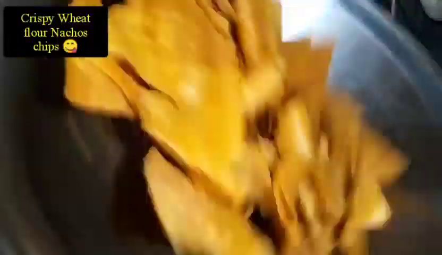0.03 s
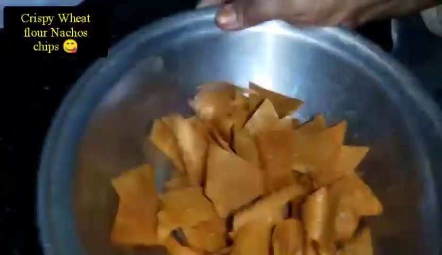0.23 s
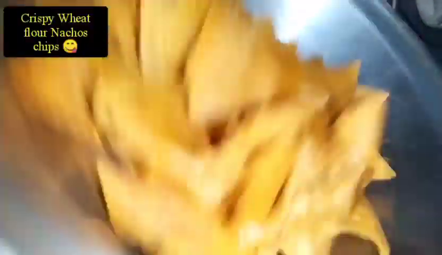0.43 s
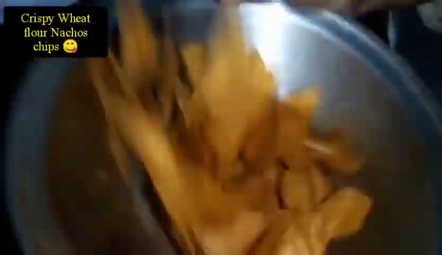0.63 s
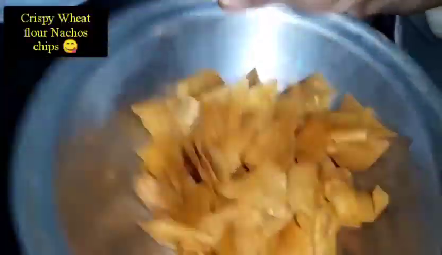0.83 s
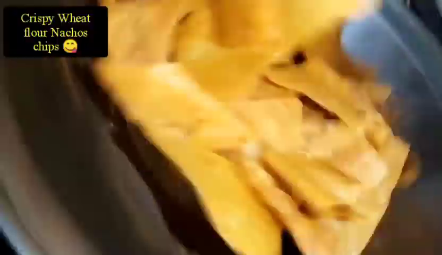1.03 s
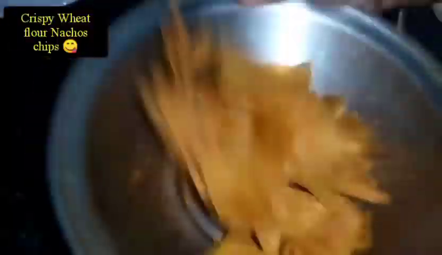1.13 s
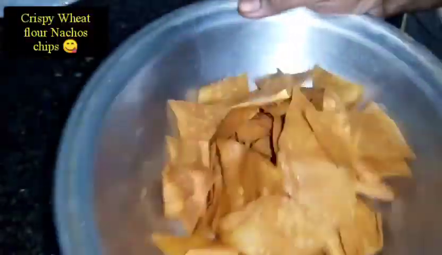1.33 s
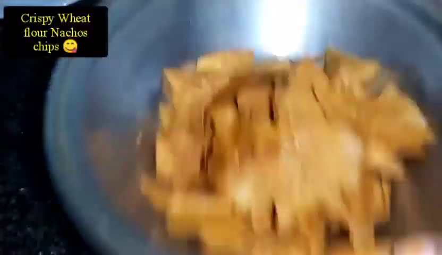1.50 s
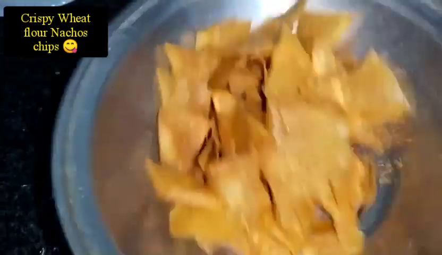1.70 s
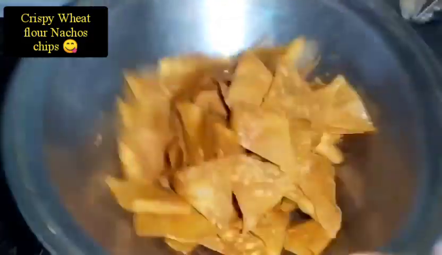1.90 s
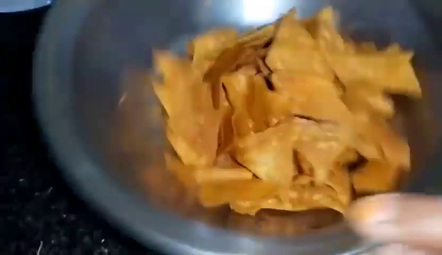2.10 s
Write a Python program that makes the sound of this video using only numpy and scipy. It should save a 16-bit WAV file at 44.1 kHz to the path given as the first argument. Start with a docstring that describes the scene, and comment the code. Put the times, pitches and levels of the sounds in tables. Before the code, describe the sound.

Crisp chips clatter in a steel bowl, tossed three times and landing at about 0.2, 0.7 and 1.2 seconds. Each landing is a shower of dry clicks with a brief metallic ring and a faint low thump, with near silence between. From about 1.5 seconds to just past 2, gentler shaking gives a softer rattle over a faint rumble. The sound is close, with a short kitchen echo.

```python
"""Crisp fried chips are tossed three times in a steel bowl, then shaken gently, in a small kitchen.
Each landing is a shower of brief impacts, heard as dry clicks; chips that strike the wall excite the
bowl's normal modes. Low thumps lie under the three landings and a soft rumble under the shaking.
Hard walls add a short echo, and the room hums. An expander ducks the quiet moment while the chips
are in the air, and a limiter rounds off the peaks."""
import sys
import numpy as np
from scipy import signal
from scipy.fft import rfft, irfft, next_fast_len
from scipy.io import wavfile
from scipy.ndimage import uniform_filter1d

SR = 44100
rng = np.random.default_rng(int(sys.argv[2]) if len(sys.argv) > 2 else 0)


def unload_audio(sound):
    """Save the sound as a 16-bit wav file, at the path given as the first command line argument."""
    columns = np.transpose(np.atleast_2d(sound))
    # keep every value between -1 and 1, then stretch to whole-number steps
    steps = np.round(np.clip(columns, -1, 1) * 32767)
    wavfile.write(sys.argv[1], SR, steps.astype(np.int16))


N = 94815

# How hard the chips rattle: three tosses, then shaking. Each row: time in seconds, level in dB.
RATTLE_ENVELOPE = [(0, -43), (.056, -52), (.072, -58.5), (.11, -61.5), (.14, -58), (.171, -60),
                   (.174, -39.5), (.188, -24), (.212, -22), (.228, -15), (.275, -18), (.296, -26),
                   (.315, -22.5), (.335, -25), (.354, -24), (.364, -28), (.4, -28), (.456, -48), (.55, -54),
                   (.562, -76), (.674, -76), (.682, -29.5), (.7, -28), (.712, -20.5), (.726, -22),
                   (.744, -14), (.784, -13), (.796, -19), (.812, -15), (.85, -19), (.866, -28), (.895, -25),
                   (.946, -39), (.956, -33), (.976, -38), (1.025, -37), (1.082, -45), (1.11, -57),
                   (1.154, -63), (1.17, -42), (1.196, -44), (1.218, -18), (1.24, -13), (1.28, -13),
                   (1.303, -19), (1.335, -15), (1.366, -22), (1.43, -29), (1.45, -26), (1.49, -31),
                   (1.525, -40), (1.548, -37), (1.575, -29), (1.598, -26), (1.648, -27), (1.664, -36),
                   (1.7, -28), (1.75, -26), (1.774, -21.5), (1.834, -32.5), (1.892, -22), (1.958, -29),
                   (2.006, -33), (2.034, -27), (2.06, -33), (2.15, -32.5)]
# Single chips that snap against the pile. Each row: start in seconds, level in dB.
CHIP_SNAPS = [(.156, -44.5), (.182, -28), (0.1852, -14), (.3115, -18), (0.346, -18), (.3775, -21),
              (.5505, -47), (.657, -42), (0.6864, -25), (.7135, -17), (.7445, -9), (.7595, -13.5),
              (.7725, -14), (.8285, -16.5), (.9517, -21), (0.9886, -30), (1.0226, -26), (1.0335, -33),
              (1.0575, -27.5), (1.0779, -30), (1.156, -44), (1.167, -39), (1.2, -25.5), (1.2106, -21),
              (1.2151, -15.5), (1.241, -10), (1.274, -7.5), (1.3145, -6), (1.4476, -25), (1.6836, -23.5),
              (1.7635, -24), (1.799, -23), (2.0298, -26)]
# Spectrum of a chip's click. Each row: frequency in Hz, level in dB.
CHIP_SPECTRUM = [(30, -49), (100, -24.5), (250, -17.5), (400, -19.5), (750, -10.5), (1300, -7), (2000, -3),
                 (3100, 3), (4300, -1.5), (5200, -2.5), (6600, -5), (8200, -13.5), (10000, -19.5),
                 (13000, -22.5), (15500, -33.5)]
# Normal modes of the bowl. Each row: frequency in Hz, level in dB, T60 in seconds before added damping.
BOWL_MODES = [(486, -12.5, 0.2), (1251, -12.5, 0.25), (1435.4, -5.5, 0.14), (2020, -6, 0.16),
              (2061, -7.5, 0.15), (2116, -1, 0.15), (2843, -3, 0.16), (2930, -9, 0.12), (3077, -6, 0.043),
              (3184, -7, 0.059), (3755, -5.5, 0.14), (3880, -8.5, 0.13), (4890, -1, 0.077), (5075, -2, .06),
              (5942, -7, 0.11), (6370, -11, 0.086), (7275, -15.5, 0.07)]
# Hard blows on the wall. Each row: start in seconds, level in dB, frequency in Hz that the spot favours.
WALL_BLOWS = [(.1361, -42, 3050), (.1855, -18, 5000), (0.1997, -3.5, 2850), (.2055, -10.5, 1450),
              (.207, -17, 480), (.219, -9.5, 5000), (.233, -8, 5150), (.2445, -6, 1890), (.261, -8, 2100),
              (.2705, 0.5, 2820), (0.344, -17.5, 6100), (.679, -25, 2850), (.707, -13.5, 2100),
              (.733, -10.5, 2130), (.777, -8, 4850), (.802, -10, 4960), (.8095, -5, 5280),
              (.836, -9.5, 6970), (1.156, -39.5, 6100), (1.167, -29.5, 6800), (1.2134, -6, 2960),
              (1.228, -12.5, 2090), (1.247, -6, 2150), (1.259, -8, 1440), (1.275, -10.5, 3780),
              (1.331, -9, 2850), (1.57, -23, 2160)]
# The part of the rattle that strikes bare steel. Each row: time in seconds, level in dB over the rattle.
STEEL_SHARE = [(0, -1.5), (.18, 1), (.22, 3), (.27, 0), (.33, -5.5), (.5, -0.5), (.7, 1.5), (.77, -4.5),
               (.81, -13.5), (.86, -9.5), (.92, -5.5), (1.05, -14), (1.17, -11), (1.22, -1.5), (1.27, -2),
               (1.42, -4.5), (1.58, -3), (1.65, -7), (1.77, -4.5), (1.86, -3.5), (2.15, -3)]
# Dull knock of the wall's many well-damped modes. Each row: frequency in Hz, level in dB.
KNOCK_SPECTRUM = [(40, -29.5), (150, -13), (350, -11), (520, -3.5), (800, 0.5), (1500, -2), (3000, -3),
                  (6000, -17.5), (12000, -43.5)]
# Three low thumps, then a soft rumble. Each row: centre in seconds, level in dB, half width in seconds.
LOW_SWELLS = [(.25, -47, 0.026), (.82, -57, .04), (1.27, -60, 0.021), (1.85, -55, 0.4)]
# Spectrum of the thumps and rumble. Each row: frequency in Hz, level in dB.
RUMBLE_SPECTRUM = [(20, -18.5), (45, -14.5), (80, 1.5), (130, -0.5), (220, -9), (500, -23), (2000, -76)]
# Spectrum of the room's hum. Each row: frequency in Hz, level in dB.
HUM_SPECTRUM = [(25, -42.5), (45, -21), (80, -4), (130, -6.5), (300, -2.5), (600, -11), (2000, -16.5),
                (8000, -36), (15000, -53)]
# Reverberation of the kitchen. Each row: frequency in Hz, T60 in seconds.
KITCHEN_DECAY = [(200, 0.31), (2000, 0.28), (6000, 0.18), (14000, 0.21)]


def chip_clatter(rattle_db, offset_db=-1):
    """Impacts of chip on chip superpose into a clatter, with a few snaps standing out."""
    clatter = amp(rattle_db + offset_db) * contact_shower(rattle_db, per_s=3600)
    for (start, db), click in zip(CHIP_SNAPS, chip_clicks(len(CHIP_SNAPS))):
        add(clatter, start, amp(db) * click)
    return coloured(clatter, CHIP_SPECTRUM)


def chip_clicks(count, crack_t60_s=0.0096, clink_t60_s=.016, clink_range_hz=(999, 7572)):
    """Each impact is a damped transient: a brittle crack and a clink at the chip's own pitch."""
    t = np.arange(512) / SR
    life_scatter = np.exp(0.44 * rng.standard_normal((count, 1)))
    crack = rng.standard_normal((count, len(t))) * decay(t, life_scatter * crack_t60_s)
    clink_hz = rng.uniform(*clink_range_hz, (count, 1))
    clink = np.sin(2 * np.pi * clink_hz * t) * decay(t, clink_t60_s)
    return crack + 0.48 * clink


def contact_shower(rattle_db, per_s, crowding=.25, spread_db=4.5, window=1300):
    """Contacts form a Poisson process, held at even power and denser as the rattle grows."""
    rate = per_s * amp(crowding * (rattle_db + 20))  # equals per_s at -20 dB
    onsets = np.flatnonzero(rng.random(N) < rate / SR)
    strengths = amp(spread_db * rng.standard_normal(N))
    clicks = chip_clicks(len(onsets)) * strengths[onsets, None]
    positions = onsets[:, None] + np.arange(clicks.shape[1])
    shower = np.bincount(positions.ravel(), clicks.ravel(), N)[:N]
    power = uniform_filter1d(uniform_filter1d(shower ** 2, window), window)
    return shower / np.sqrt(np.abs(power) + 1e-6)


def wall_blows(spot_octaves=0.11, click_db=-16.5):
    """Modal excitation: a hard blow clicks, and the spot struck sets how strongly each mode rings."""
    ringing, clicking = np.zeros(N), np.zeros(N)
    mode_hz, mode_db, _ = np.transpose(BOWL_MODES)
    for (start, db, spot_hz), click in zip(WALL_BLOWS, chip_clicks(len(WALL_BLOWS))):
        weights = 1 / (1 + (np.log2(mode_hz / spot_hz) / spot_octaves) ** 2)
        weights /= np.linalg.norm(weights * amp(mode_db))
        weights *= rng.choice([-1, 1], len(mode_hz))
        add(ringing, start, amp(db) * weights @ bowl_partials(t60_scale=0.87, detune=0.0023))
        add(clicking, start, amp(db + click_db) * click)
    return radiated(ringing) + coloured(clicking, CHIP_SPECTRUM)


def wall_rattle(rattle_db, pile_t60_scale=0.68, knock_db=-7):
    """Forced vibration: light contacts knock on the steel and drive modes damped by the sliding pile."""
    signs = (-1) ** np.arange(len(BOWL_MODES))
    response = signs @ bowl_partials(pile_t60_scale, detune=0)
    drive = amp(rattle_db + envelope(STEEL_SHARE)) * contact_shower(rattle_db, per_s=1200)
    return radiated(convolved(drive, response)) + amp(knock_db) * coloured(drive, KNOCK_SPECTRUM)


def bowl_partials(t60_scale, detune):
    """In free vibration, each normal mode of the bowl is an exponentially decaying sinusoid."""
    hz, db, t60 = np.transpose(BOWL_MODES)[:, :, None]
    t = np.arange(9000) / SR
    hz = hz * (1 + detune * rng.standard_normal(hz.shape))
    return amp(db) * np.sin(2 * np.pi * hz * t) * decay(t, t60 * t60_scale)


def bowl_singing(start_s=.679, end_s=.733, db=-22.5, attack_s=.02, release_s=.007):
    """Resonance: the lowest mode swells as the pile slides in the second toss, until its fall damps it."""
    t = np.arange(N) / SR
    swell = 1 - np.exp(-np.maximum(t - start_s, 0) / attack_s)
    damping = np.exp(-np.maximum(t - end_s, 0) / release_s)
    return amp(db) * swell * damping * np.sin(2 * np.pi * BOWL_MODES[0][0] * t)


def radiated(vibration, cutoff_hz=525):
    """Radiation efficiency falls at low frequencies, so the open bowl gives off little bass."""
    return signal.sosfilt(signal.butter(2, cutoff_hz, "high", fs=SR, output="sos"), vibration)


def low_rumble():
    """Amplitude-modulated low noise thumps under the three landings and rumbles during the shaking."""
    t = np.arange(N) / SR
    swell = sum(amp(db) * np.exp(-.5 * ((t - centre) / width) ** 2) for centre, db, width in LOW_SWELLS)
    return swell * noise(RUMBLE_SPECTRUM)


def kitchen_echo(direct, db=-10.5):
    """Reverberation: reflections from hard walls merge into a short tail, shorter in the treble."""
    hz, t, spectra = signal.stft(rng.standard_normal(SR // 2), SR, nperseg=256)
    fading = decay(t, at_frequency(KITCHEN_DECAY, hz)[:, None])
    _, tail = signal.istft(spectra * fading, SR, nperseg=256)
    return amp(db) * convolved(direct, tail)


def room_hum(db=-56):
    """Stationary noise, strongest in the bass, forms the hum of the room."""
    return amp(db) * noise(HUM_SPECTRUM)


def noise(spectrum):
    """Filtered Gaussian noise has the given spectrum and an rms of 1."""
    x = coloured(rng.standard_normal(N), spectrum)
    return x / np.sqrt(np.mean(x ** 2) + 1e-20)


def coloured(x, spectrum, size=8192):
    """A minimum-phase filter imposes the spectrum causally."""
    gain = amp(at_frequency(spectrum, np.fft.rfftfreq(size, 1 / SR)))
    cepstrum = irfft(np.log(gain))
    cepstrum[1:size // 2] *= 2
    cepstrum[size // 2 + 1:] = 0
    return convolved(x, irfft(np.exp(rfft(cepstrum))))


def convolved(x, response):
    """Convolution applies an impulse response scaled to unit energy."""
    return signal.fftconvolve(x, response / np.linalg.norm(response))[:N]


def decay(t, t60):
    """Exponential decay loses 60 dB in the time T60."""
    return 1e-3 ** (t / t60)


def amp(db):
    """Amplitude grows tenfold per 20 dB."""
    return 10 ** (np.asarray(db) / 20)


def at_frequency(rows, hz):
    """Interpolation on a logarithmic frequency axis."""
    row_hz, values = np.transpose(rows)
    return np.interp(np.log(hz + 1), np.log(row_hz), values)


def envelope(rows):
    """Linear interpolation in time, one value per sample."""
    return np.interp(np.arange(N) / SR, *np.transpose(rows))


def add(track, start_s, sound):
    """Superposition of a sound on a track."""
    i = max(0, round(start_s * SR))
    track[i:i + len(sound)] += sound[:N - i]


def scene():
    """The direct sound of chips and bowl superposes with its echo, the rumble and the hum."""
    background = low_rumble() + room_hum()
    rattle_db = envelope(RATTLE_ENVELOPE)
    direct = wall_blows() + chip_clatter(rattle_db) + wall_rattle(rattle_db) + bowl_singing()
    return (direct + kitchen_echo(direct) + background)[None]


def record(dry, threshold_db=-50.5, duck_slope=2.5, max_duck_db=18, ceiling=1.03, knee=8, top_hz=15600):
    """Downward expansion ducks quiet moments, saturation rounds the peaks, a low-pass cuts the top."""
    level_db = 10 * np.log10(np.abs(uniform_filter1d(dry ** 2, 900)) + 1e-12)
    ducked = dry * amp(-np.clip(duck_slope * (threshold_db - level_db), 0, max_duck_db))
    rounded = ducked / (1 + np.abs(ducked / ceiling) ** knee) ** (1 / knee)
    size = next_fast_len(N + SR // 2)
    passband = np.fft.rfftfreq(size, 1 / SR) < top_hz
    return irfft(rfft(rounded, size) * passband, size)[..., :N]


dry = scene()
out = record(dry)
unload_audio(out)
```